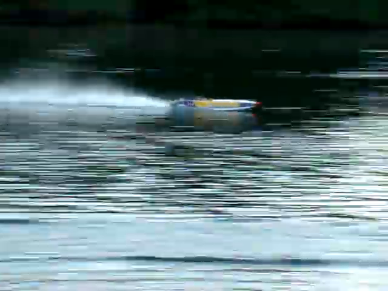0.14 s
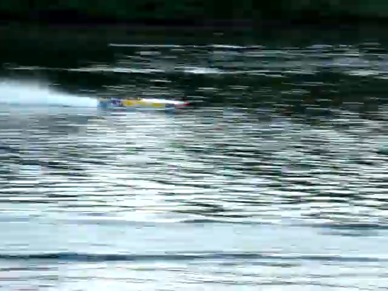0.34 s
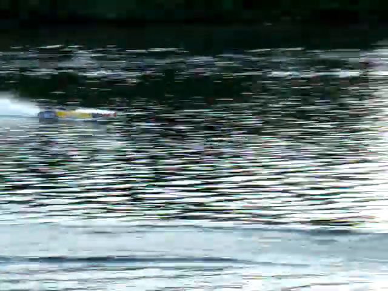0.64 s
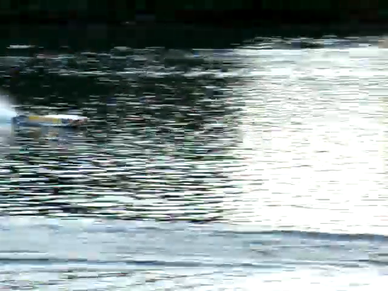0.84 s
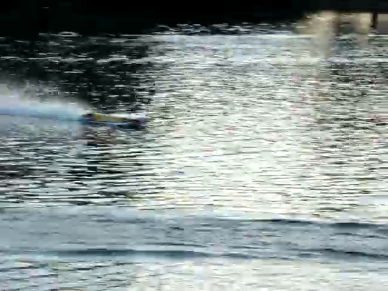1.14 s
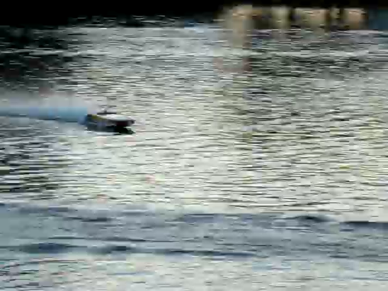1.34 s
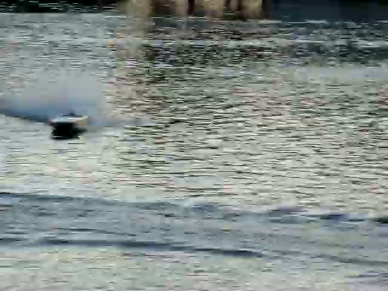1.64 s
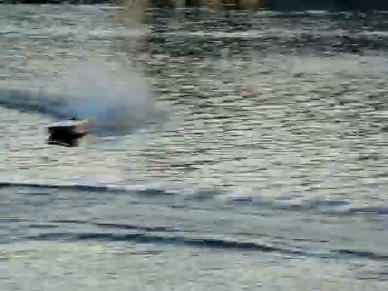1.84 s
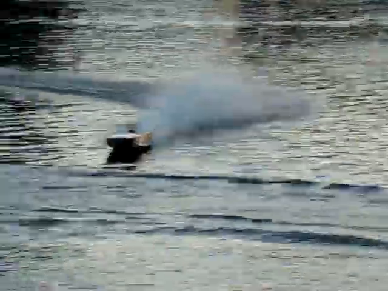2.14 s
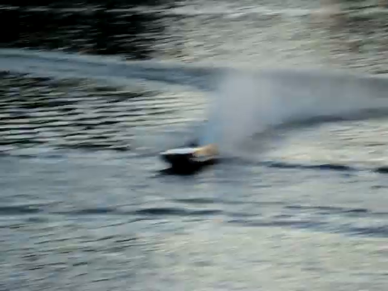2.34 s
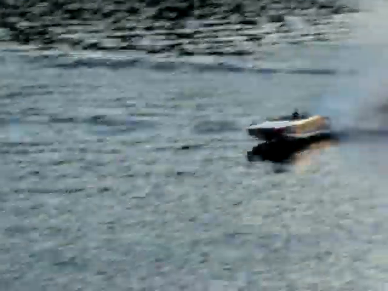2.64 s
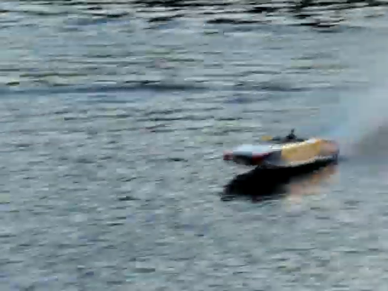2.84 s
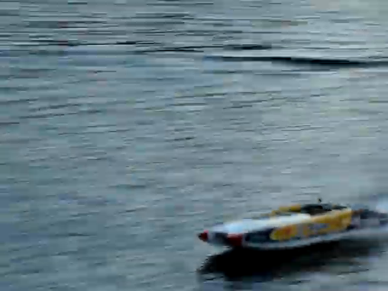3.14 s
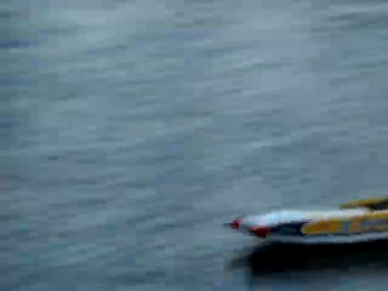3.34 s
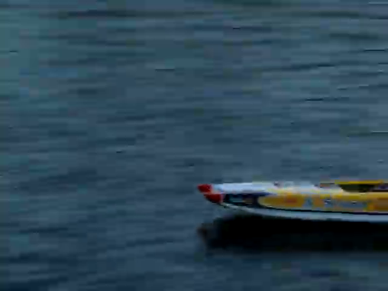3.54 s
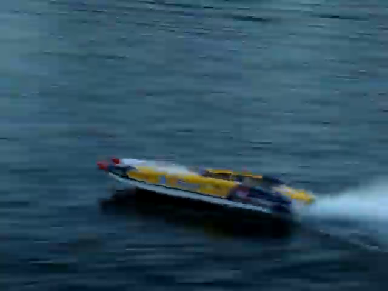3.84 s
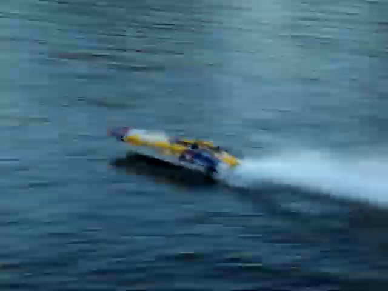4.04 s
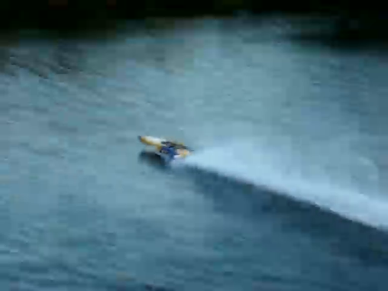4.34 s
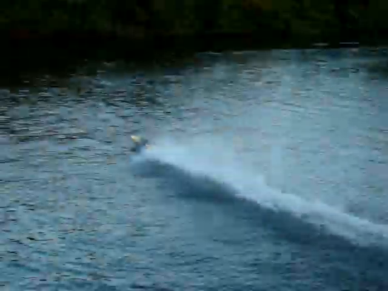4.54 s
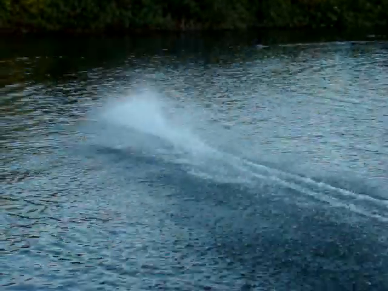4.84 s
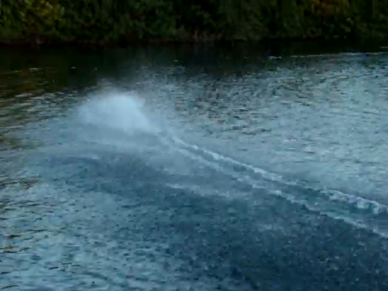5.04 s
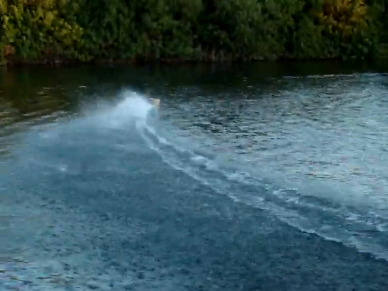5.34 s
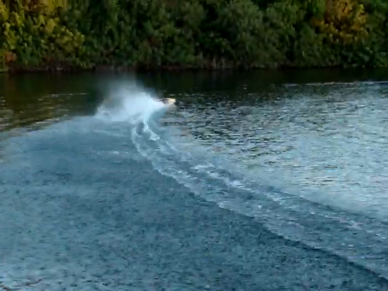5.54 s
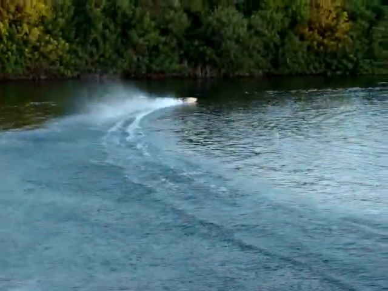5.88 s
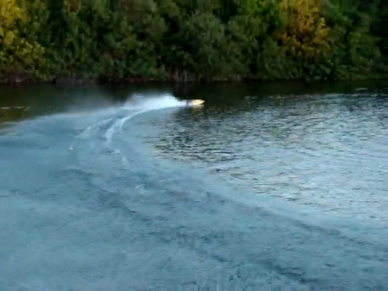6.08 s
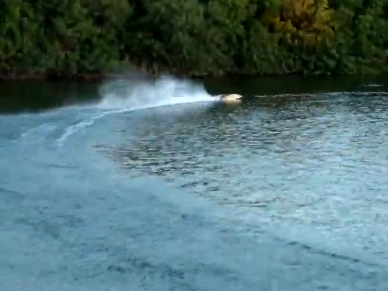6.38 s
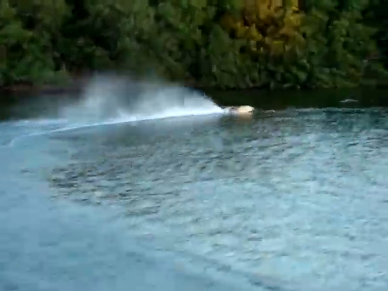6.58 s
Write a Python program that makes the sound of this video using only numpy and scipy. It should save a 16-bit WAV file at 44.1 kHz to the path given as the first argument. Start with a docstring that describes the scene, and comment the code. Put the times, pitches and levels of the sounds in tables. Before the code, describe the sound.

A two-stroke model speedboat buzzes around a lake at high revs, pitch rising and falling, popping in turns and hissing past.

```python
"""A two-stroke model race boat laps a lake; each firing cracks out of the tuned pipe and the wooded
shore returns a long wash. It starts off the throttle, stumbling, and reaches racing revs by 2 s.
At 3 s it turns with a burst of single bangs; at 3.9 s it passes closest, propeller spray hissing.
It runs away while a camera's zoom motor hums in four faint bursts (3.7-6.2 s).
From 5 s it sputters and bangs through the far turn, then revs up again."""
import sys
import numpy as np
from scipy import signal
from scipy.fft import rfft, irfft, next_fast_len
from scipy.io import wavfile
from scipy.ndimage import uniform_filter1d, map_coordinates

SR = 44100
rng = np.random.default_rng(int(sys.argv[2]) if len(sys.argv) > 2 else 0)


def unload_audio(sound):
    """Save the sound as a 16-bit wav file, at the path given as the first command line argument."""
    columns = np.transpose(np.atleast_2d(sound))
    # keep every value between -1 and 1, then stretch to whole-number steps
    steps = np.round(np.clip(columns, -1, 1) * 32767)
    wavfile.write(sys.argv[1], SR, steps.astype(np.int16))


N = 295911
LEAD = SR  # 1 s run-in, so the echo is already sounding at t = 0
TIME = np.arange(-LEAD, N) / SR
SIZE = next_fast_len(len(TIME) + 2 * SR, real=True)
HZ = np.fft.rfftfreq(SIZE, 1 / SR)
TOP_HZ = 10200

# firing rate as heard: (time [s], rate [Hz])
FIRING_RATE = [(-0.1, 234), (0.03, 205.8), (0.13, 158.1), (0.2, 160.5), (0.45, 102.8), (0.55, 99.8),
               (0.69, 124.4), (0.85, 126.1), (0.915, 177.5), (0.955, 184), (1.03, 169.7), (1.1, 150.1),
               (1.27, 123.3), (1.43, 117.3), (1.55, 178.2), (1.62, 206), (1.66, 203.3), (1.77, 168.6),
               (1.83, 156.7), (1.89, 193.2), (1.97, 218.2), (2.02, 242.5), (2.06, 251.2), (2.2, 232),
               (2.33, 223.3), (2.57, 236.6), (2.6, 247.6), (2.73, 243.6), (2.755, 215.9), (2.85, 222.3),
               (2.88, 230.5), (2.95, 229.6), (3.03, 197.1), (3.08, 202.8), (3.21, 138.9), (3.3, 134.5),
               (3.39, 150.6), (3.46, 142.7), (3.53, 177.9), (3.69, 182.6), (3.77, 202.2), (3.85, 231.7),
               (3.92, 221.2), (3.97, 227.7), (4.03, 215.6), (4.25, 219.9), (4.57, 227.5), (4.7, 223.7),
               (4.95, 225.2), (5.015, 182.9), (5.11, 188.2), (5.175, 208.7), (5.25, 164.1), (5.31, 163.7),
               (5.42, 199.4), (5.62, 207.3), (5.79, 210.8), (5.94, 129.4), (6.03, 130.2), (6.11, 164.9),
               (6.22, 191.9), (6.31, 194.3), (6.44, 217.5), (6.71, 226)]
# brief jumps and dips in pitch and rasp, including the throttle snapping shut near 5 s:
# (time [s], half length [s], rate change [Hz], rasp change [dB])
REV_FLICKS = [(2.512, .03, 4.5, -0.5), (2.592, 0.019, 8, -1), (2.82, .03, 0, -3), (2.869, .025, 0, 5),
              (2.933, .035, -1, 5), (3.065, .024, 3, 3), (4.288, 0.022, 0.5, 1), (4.338, 0.019, 1.5, -2),
              (4.421, 0.028, -1.5, 5.5), (4.535, 0.017, 0.5, 3), (4.61, 0.032, -12.5, 6),
              (4.649, 0.017, 1, 7.5), (4.781, 0.035, 7, 6), (4.852, .028, -12, 3), (4.912, .028, 7, 7),
              (4.979, 0.02, -4.5, -3), (5.146, 0.038, 1, 8), (6.249, 0.059, -0.5, 6.5),
              (6.403, .018, 3.5, 7.5)]
# spectrum of one firing from astern: (frequency [Hz], gain [dB])
STERN_SPECTRUM = [(50, -79), (95, -42), (135, -27), (225, -17.5), (450, -8), (660, -21.5), (890, -3),
                  (1120, 2.5), (1420, -11.5), (1850, -1.5), (2150, -11), (2700, -2.5), (3200, -3.5),
                  (3800, -9.5), (4550, -10), (5200, -6.5), (10000, -4.5)]


def engine(chop_db=0.76, flicker_db=1.0, splash_db=1.39, wash_sizzle_db=6):
    """Direct exhaust plus shore wash in five bands, balanced by heading and distance."""
    # heading: (time [s], share heard from astern [0-1])
    heading = [(0, 0), (2.9, 0), (3.4, 0.96), (3.8, 0.94), (4.95, 0.94), (5.5, 0.88), (6.1, 0.21),
               (6.7, 0.3)]
    # spectrum of one firing from ahead: (frequency [Hz], gain [dB])
    bow_spectrum = [(50, -57), (85, -39), (125, -16), (230, -8.5), (460, 1.5), (700, -9), (950, -1),
                    (1200, -7.5), (1420, -9.5), (1650, -5.5), (1950, -0.5), (2300, -7), (2750, 3.5),
                    (3350, -1.5), (4450, -8), (5200, -7.5), (10000, -15.5)]
    # shore wash over direct sound: (time [s], bass [dB], treble [dB])
    wash_ratio = [(0, -7, 6), (.6, 15, -0.5), (.85, 0.5, 1), (.95, -5, -4), (1.2, 6.5, 2), (1.4, 2, 4),
                  (1.55, -5, -3.5), (1.87, -4.5, -3.5), (2.1, -11.5, -1.5), (2.7, -2.5, -3.5),
                  (3.07, -10, -5), (3.14, -5, -2), (3.45, -6, -3.5), (3.53, -8, -7), (3.85, -22.5, -10.5),
                  (4.9, -10.5, -13.5), (5.25, -6.5, -9.5), (5.78, -6, -6.5), (5.9, -5, 2), (6.05, 1, 0),
                  (6.25, 2, -9.5), (6.7, -0.5, -4.5)]
    # crossovers between boom, honk, whine, rasp and sizzle: (frequency [Hz])
    edges_hz = [620, 1500, 2400, 4500]
    blast = exhaust(*firings())
    astern = np.clip(curves(heading)[0], 0, 1)
    bow, stern = (steady(filtered(blast, outlet(side))) for side in (bow_spectrum, STERN_SPECTRUM))
    direct = water_bounce((1 - astern) * bow + astern * stern)
    wash = water_bounce(shore(blast))
    lowpasses = [0] + [1 / (1 + (HZ / hz) ** 8) for hz in edges_hz] + [HZ < TOP_HZ]
    boom, honk, whine, rasp, sizzle = band_levels_db(astern)
    shake_db = chop_db * wobble(TIME, rate_hz=35)  # hull slaps over the chop
    sizzle = sizzle + splash_db * wobble(TIME, rate_hz=110)  # splashes shade the top band
    gains = [amp(shake_db + db + flicker_db * wobble(TIME, rate_hz=60))
             for db in (boom, honk, whine, rasp, sizzle)]
    bass_db, treble_db = curves(wash_ratio)
    wets = amp([bass_db, (bass_db + treble_db) / 2, treble_db, treble_db, treble_db + wash_sizzle_db])
    return sum(gain * steady(filtered(direct + wet * wash, upper - lower))
               for gain, wet, lower, upper in zip(gains, wets, lowpasses, lowpasses[1:]))


def firings(jitter_s=18e-6, slack_jitter_s=80e-6, scatter=0.12, waver=0.0022, four_stroke=0.45,
            smooth_hz=175, stumble_hz=125, slack_per_oct=3.8):
    """Firing times [s] and strengths; at low or falling revs the burn grows uneven."""
    flicks_hz = sum(hz * bell(s, half_s) for s, half_s, hz, _ in REV_FLICKS)
    rate_hz = curves(FIRING_RATE)[0] + flicks_hz
    turns = np.cumsum(rate_hz * (1 + waver * wobble(TIME, rate_hz=35))) / SR
    times = np.interp(np.arange(1, turns[-1]), turns, TIME)
    _, lost_oct = rev_octaves()
    starved = np.maximum(smooth_hz - rate_hz, 0) / (smooth_hz - stumble_hz) + slack_per_oct * lost_oct
    sputter = 0.9 * bell(centre_s=5.15, half_s=0.2)  # part throttle in the far turn
    slack = np.clip(np.interp(times, TIME, starved + sputter), 0, 1)
    late, strong = rng.uniform(-1, 1, (2, 2048))[:, :len(times)]
    alternation = 1 + four_stroke * slack * (-1) ** np.arange(len(times))  # every other turn weakens
    sizes = alternation * (1 + strong * np.minimum(scatter + slack, 1))
    return times + late * (jitter_s + slack * slack_jitter_s), sizes


def rev_octaves(racing_hz=220, coast_s=0.047):
    """Octaves above racing revs, and octaves just lost by closing the throttle."""
    revs_oct = np.log2(curves(FIRING_RATE)[0] / racing_hz)
    return revs_oct, np.maximum(np.interp(TIME - coast_s, TIME, revs_oct) - revs_oct, 0)


def exhaust(times, sizes, gas_gain=0.55, gas_hz=5800, glint_gain=0.27, glint_hz=700, spread_s=0.004):
    """Each firing leaves the pipe with a hissing puff of gas and glances off shifting ripples."""
    train = pulses(times, sizes)
    gas = gas_gain * filtered(puffs(train, decay_s=0.001), HZ ** 3 / np.hypot(HZ ** 3, gas_hz ** 3))
    glints = 0
    for delay_s in rng.uniform(0, spread_s, size=6):
        path_s = delay_s * (1 + 0.06 * wobble(times, rate_hz=3))
        glints = glints + pulses(times + path_s, glint_gain * sizes * wobble(times, rate_hz=5))
    return train + gas + filtered(glints, HZ / np.hypot(HZ, glint_hz))  # long waves pass unscattered


def outlet(spectrum, pivot_hz=3000):
    """Response of the pipe's mouth from one side, with the ringing of its wall."""
    # pipe wall modes: (frequency [Hz], width [Hz], gain [dB])
    wall_modes = [(2660, 220, -7), (3080, 220, -8), (3420, 200, 0)]
    ring = sum(amp(db) * 1j * HZ * width / (hz ** 2 - HZ ** 2 + 1j * HZ * width)
               for hz, width, db in wall_modes)
    allpass = (pivot_hz - 1j * HZ) / (pivot_hz + 1j * HZ)  # lows lag, so each crack swings both ways
    return colour(spectrum) * allpass * (1 + ring)


def band_levels_db(astern, rasp_db_per_oct=1, sizzle_db_per_oct=6.5, coast_db_per_oct=12):
    """Levels of boom, honk, whine, rasp and sizzle from revs, heading, distance and rev flicks."""
    # bass, strongest bow on: (time [s], level [dB])
    boom_level = [(0.0, -35.5), (0.9, -26), (1.0, -31), (1.5, -25.5), (2.9, -36.5), (3.0, -42.5),
                  (3.1, -39.5), (3.7, -44), (3.9, -42), (4.1, -45.5), (4.2, -49), (5.3, -53.5),
                  (5.5, -45.5), (6.71, -37.5)]
    # rasp reaching the bank at racing revs, before trim: (time [s], level [dB])
    rasp_level = [(0, -21), (.45, -27), (.85, -24), (.98, -20.5), (1.25, -23.5), (1.85, -22), (2.6, -21.5),
                  (3.075, -22), (3.11, -32.5), (3.3, -28), (3.47, -28), (3.53, -25), (3.8, -32),
                  (4.45, -26.5), (4.94, -30.5), (4.96, -34.5), (5.15, -36.5), (5.4, -36.5), (5.9, -35),
                  (6.22, -26), (6.71, -21.5)]
    # whine near 2 kHz, before trim: (time [s], level [dB])
    whine_level = [(0.0, -30), (0.17, -26.5), (0.56, -33), (0.9, -30), (0.99, -20), (1.03, -31),
                   (2.0, -23.5), (2.5, -28), (3.07, -27.5), (3.13, -28.5), (3.24, -25.5), (3.29, -33),
                   (3.37, -27), (3.45, -32), (3.6, -30.5), (4.04, -33), (4.06, -30), (4.91, -31.5),
                   (4.97, -36), (5.34, -47), (5.75, -36), (5.92, -49), (6.13, -27.5), (6.5, -28.5),
                   (6.71, -37)]
    # the pipe's beam sweeps the bank: (time [s], half length [s], honk gain [dB])
    beam_sweeps = [(1.623, 0.082, 5), (4.467, 0.16, 5)]
    boom, reach, whine = curves(boom_level) + curves(rasp_level) + curves(whine_level)
    revs_oct, lost_oct = rev_octaves()
    coast_db = coast_db_per_oct * lost_oct
    abeam = bell(centre_s=3.936, half_s=0.56)  # closest pass
    flick_db = sum(db * bell(s, half_s) for s, half_s, _, db in REV_FLICKS)
    beam_db = sum(db * bell(s, half_s) for s, half_s, db in beam_sweeps)
    aim_db = 2.5 * astern - 3 * abeam + beam_db
    honk = (boom + reach) / 2 + 0.28 + aim_db - coast_db
    whine = whine - 2.5 + 0.19 * flick_db
    rasp = reach - 4 + rasp_db_per_oct * revs_oct + flick_db - coast_db
    carry_db = reach + 0.42 * (boom - reach) + 9.5 * abeam  # the top band carries best nearby
    sizzle = carry_db + 0.5 + sizzle_db_per_oct * revs_oct + 0.082 * flick_db - coast_db
    return boom, honk, whine, rasp, sizzle


def water_bounce(x, half_width_hz=150):
    """The path off the water joins the straight one, lifting or dipping three moving bands."""
    # lower two bands: (time [s], lower centre [Hz], gain [dB], upper centre [Hz], gain [dB])
    bounce_bands = [(0.1, 1130, 9, 2270, 5), (.42, 1180, 10.5, 2300, -0.5), (.7, 717.5, 2.5, 2000, 4),
                    (.96, 899.2, 3, 2050, 6.5), (1.3, 790, -0.5, 1800, -1.5), (1.62, 1195, 7.5, 1749, 4),
                    (1.85, 1179, 9, 1793, 9), (2.0, 1208, 6, 2000, 17.5), (2.2, 1180, 1, 1877, 3),
                    (2.45, 1212, -3, 1615, -3.5), (2.72, 722.2, 2.5, 1960, 2), (2.9, 1380, -5, 2080, 9.5),
                    (3.07, 1320, 7.5, 2020, 16), (3.15, 950, 6, 1860, -11), (3.24, 1150, 5, 1580, 2.5),
                    (3.37, 1100, 13, 1680, 11), (3.44, 1116, 10, 1800, 7), (3.53, 1252, 21, 1998, 5),
                    (3.7, 1269, 10, 2034, 7), (3.9, 1157, -2, 1981, -3.5), (4.5, 1130, 13.5, 1820, -1),
                    (4.8, 1115, 10, 1820, 0.5), (5.5, 1011, 11, 1800, -2), (6.1, 990, 2, 1700, -2.5),
                    (6.7, 1260, 4, 1520, 4)]
    # band of the scream that shifts as the boat turns: (time [s], centre [Hz], gain [dB])
    scream_band = [(0.1, 2670, 1.5), (1.0, 3497, -1.5), (1.9, 2571, 1), (2.33, 3440, 1.5), (2.6, 3330, 1),
                   (2.89, 3006, 6.5), (3.2, 3047, 0), (3.9, 3137, 9.5), (4.4, 2710, 1.5), (4.9, 2550, 1),
                   (5.4, 2980, 1.5), (6.1, 2802, 5.5), (6.3, 3600, 2)]
    hz, t, spectra = signal.stft(x, SR, nperseg=1024)
    tracks = [np.interp(t + TIME[0], TIME, v) for v in curves(bounce_bands) + curves(scream_band)]
    gain_db = sum(db / (1 + ((hz[:, None] - centre_hz) / half_width_hz) ** 2)
                  for centre_hz, db in zip(tracks[::2], tracks[1::2]))
    return signal.istft(spectra * amp(gain_db), SR)[1][:len(x)]


def afterfires(crack_hz=6000, thud_hz=900, gas_gain=0.65):
    """Unburnt charge ignites in the pipe: a sharp crack near its mouth, a dull thud deep inside."""
    # lone bangs: (time [s], peak without gas [dB])
    cracks = [(0.5356, -11), (0.8386, -12), (3.0003, -14), (3.015, -11), (3.0747, -10.5), (3.0946, -10),
              (3.2454, -4), (3.2676, -10), (3.2824, -4), (3.3194, -6), (3.3337, -4), (3.3477, -9),
              (3.3615, -10), (3.3749, -9), (3.3881, -7.5), (3.4014, -2), (3.4354, -8.5), (3.4493, -15),
              (3.4632, -16), (3.4768, -11), (5.0547, -25), (5.0812, -19), (5.2732, -24), (5.3036, -25),
              (5.9451, -10.5), (5.9684, -7.5), (5.9913, -18), (6.0212, -8), (6.0371, -12), (6.1908, -10)]
    # muffled afterfires: (time [s], peak without gas [dB])
    thuds = [(5.8526, -20.5), (5.892, -21), (5.981, -34), (6.071, -20), (6.1506, -17)]
    out = 0
    for rows, damping in [(cracks, 1 + 1j * HZ / crack_hz), (thuds, (1 + 1j * HZ / thud_hz) ** 2)]:
        times, db = np.transpose(rows)
        pipe = outlet(STERN_SPECTRUM) / damping
        pipe_peak = np.abs(irfft(pipe * (HZ < TOP_HZ))).max()
        train = pulses(times, amp(db)) / pipe_peak
        out = out + filtered(train + gas_gain * puffs(train, decay_s=0.0018), pipe)
    return out


def shore(blast, t60_s=1.25, rise_s=0.035, delay_s=0.12, smear_s=0.0072, slap_gain=3,
          blur_gain=0.4, blur_hz=250):
    """The far bank answers once; its trees scatter the firings into a long, partly pitchless wash."""
    # spectrum of the wash: (frequency [Hz], gain [dB])
    wash_spectrum = [(40, -37.5), (90, -19.5), (200, -7), (360, -3), (750, -0.5), (1200, -4.5),
                     (1650, -1.5), (2600, 4), (3500, 5), (3950, -2), (4250, 0.5), (4550, -7), (5000, -7.5),
                     (10000, -21.5)]
    # standing waves of the pipe, colouring the wash: (frequency [Hz], width [Hz], gain [dB])
    pipe_modes = [(128, 25, 6), (250, 40, 4), (375, 45, 4), (512, 40, 3.5), (615, 40, 3), (708, 45, 4),
                  (810, 45, 1)]
    t = np.arange(2 * SR) / SR
    slap = slap_gain * (t > delay_s) * np.exp(-np.abs(t - delay_s) / smear_s)
    trees = amp(-60 * t / t60_s) * (1 - np.exp(-t / rise_s))
    impulse_response = rng.standard_normal(len(t)) * (slap + trees)
    echo = steady(filtered(blast, rfft(impulse_response, SIZE)))
    blur = blur_gain * filtered(noise(), HZ / np.hypot(HZ, blur_hz))
    pipe_db = sum(db / (1 + (2 * (HZ - hz) / width) ** 2) for hz, width, db in pipe_modes)
    return steady(filtered(echo + blur, colour(wash_spectrum) * amp(pipe_db)))


def spray(flutter_db=2.8):
    """The plume thrown by the propeller hisses and flutters."""
    # hiss of the plume: (time [s], level [dB])
    hiss_level = [(3.1, -71), (3.55, -40), (3.9, -28.5), (4.3, -38), (4.65, -40.5), (5, -48.5)]
    # spectrum of the hiss: (frequency [Hz], gain [dB])
    hiss_spectrum = [(50, -83), (300, -29), (1500, -27), (4500, -14), (6500, 22.5), (8500, 27),
                     (10000, -28)]
    hiss = steady(filtered(noise(), colour(hiss_spectrum)))
    return hiss * amp(curves(hiss_level)[0] + flutter_db * wobble(TIME, rate_hz=230))


def zoom_motor(hum_hz=151):
    """The lens motor hums, switching on and off abruptly."""
    # motor runs: (start [s], length [s], rms level [dB])
    runs = [(3.658, 0.087, -57), (4.554, 0.1, -56), (5.452, 0.11, -57), (6.148, 0.092, -56)]
    out = 0
    for start_s, length_s, db in runs:
        running = (TIME > start_s) & (TIME < start_s + length_s)
        out = out + amp(db) * running * np.sqrt(2) * np.cos(2 * np.pi * hum_hz * (TIME - start_s))
    return out


def air(level_db=-78):
    """Faint outdoor rumble."""
    spectrum = [(25, -8.0), (120, -9.5), (1000, -23.5), (8000, -38)]  # (frequency [Hz], gain [dB])
    return amp(level_db) * steady(filtered(noise(), colour(spectrum)))


def amp(db):
    """Decibels to gain."""
    return 10 ** (np.asarray(db) / 20)


def steady(x):
    """x held at rms 1 over about 0.1 s."""
    power = uniform_filter1d(uniform_filter1d(x ** 2, size=3500), size=3500)
    return x / np.sqrt(np.abs(power) + 1e-14)


def curves(rows):
    """List of per-sample curves, one for each column after the time."""
    times, *columns = np.transpose(rows)
    return [np.interp(TIME, times, column) for column in columns]


def bell(centre_s, half_s):
    """Gaussian swell from 0 to 1 and back."""
    return np.exp(-((TIME - centre_s) / half_s) ** 2)


def noise():
    """White noise."""
    return rng.standard_normal(len(TIME))


def wobble(t, rate_hz):
    """Smooth random curve at times t, with knots at rate_hz."""
    return map_coordinates(rng.standard_normal(size=2048), [(t - TIME[0]) * rate_hz], mode="mirror")


def filtered(x, response):
    """x through a frequency response."""
    return irfft(rfft(x, SIZE) * response, SIZE)[:len(TIME)]


def colour(points):
    """Minimum-phase response through (frequency [Hz], gain [dB]) points."""
    hz, db = np.transpose(points)
    cepstrum = irfft(np.log(amp(np.interp(np.log(HZ + 1), np.log(hz), db))), SIZE)
    cepstrum[1:SIZE // 2] *= 2
    cepstrum[SIZE // 2 + 1:] = 0
    return np.exp(rfft(cepstrum))


def pulses(times, sizes):
    """Windowed-sinc impulses placed between samples."""
    at = times * SR + LEAD
    taps = np.floor(at).astype(int)[:, None] + np.arange(-7, 9)
    offset = taps - at[:, None]
    weights = sizes[:, None] * np.sinc(offset) * np.sinc(offset / 8)
    return np.bincount(np.maximum(taps, 0).ravel(), weights.ravel(), len(TIME))[:len(TIME)]


def puffs(train, decay_s):
    """Turbulent gas after each pulse, with the pulse's energy."""
    pole = np.exp(-1 / (decay_s * SR))
    return noise() * np.sqrt(np.abs(signal.lfilter([1 - pole], [1, -pole], train ** 2)))


def scene():
    """All sources at one point on the bank, on two equal channels."""
    mix = engine() + afterfires() + spray() + zoom_motor() + air()
    return mix[None, LEAD:].repeat(2, axis=0)


def record(dry, ceiling=0.44, low_cut_hz=45):
    """Mono camera microphone: rounds the tallest cracks, sheds deep bass, cuts steeply at TOP_HZ."""
    rounded = dry / (1 + np.abs(dry / ceiling) ** 6) ** (1 / 6)
    low_cut = HZ / np.hypot(HZ, low_cut_hz)
    high_cut = 1 / np.sqrt(1 + (HZ / TOP_HZ) ** 400)
    return irfft(rfft(rounded, SIZE) * low_cut * high_cut, SIZE)[:, :N]


dry = scene()
out = record(dry)
unload_audio(out)
```